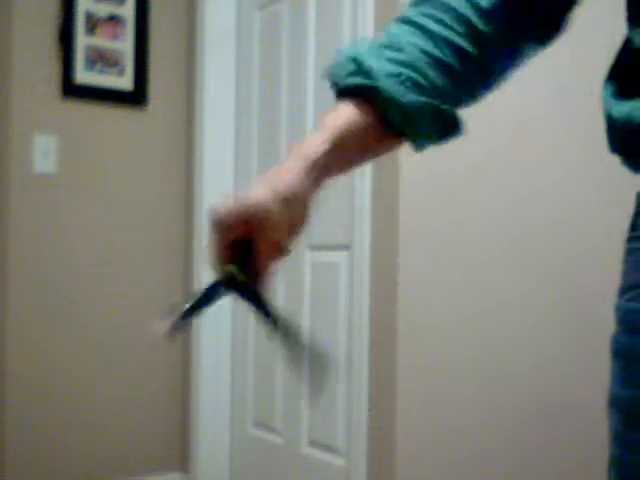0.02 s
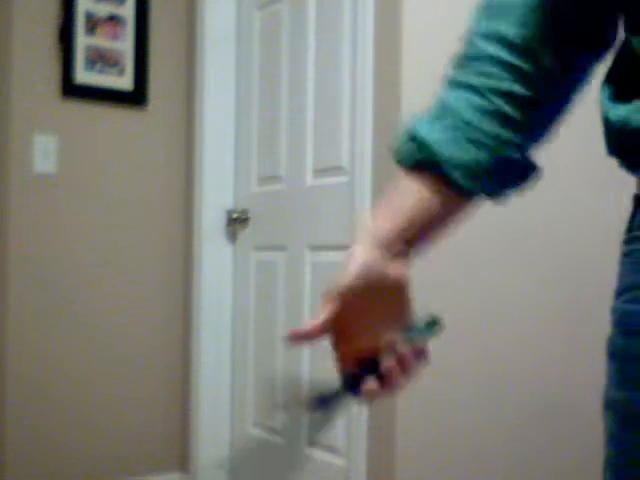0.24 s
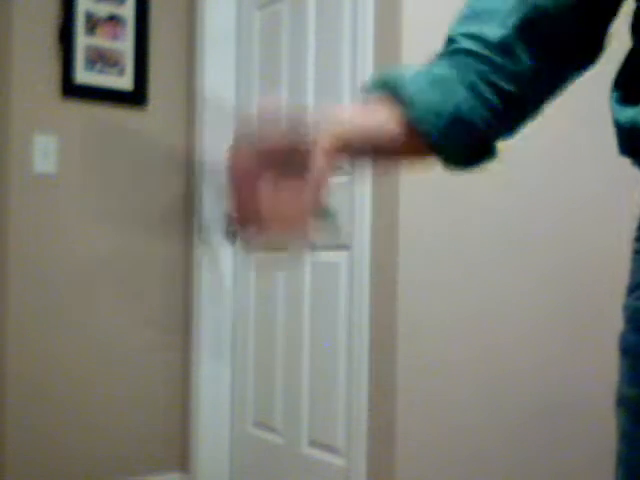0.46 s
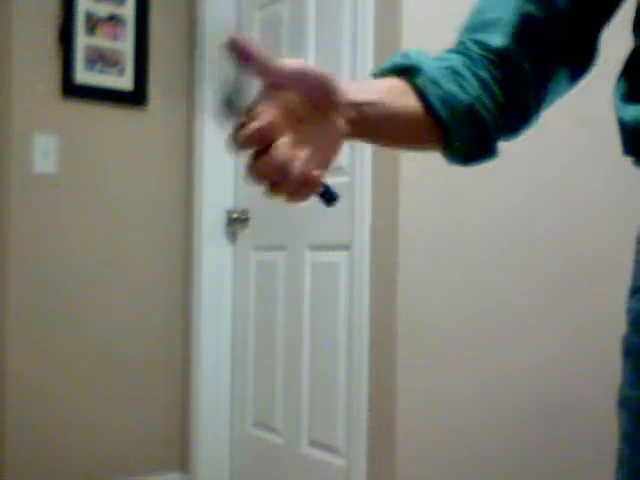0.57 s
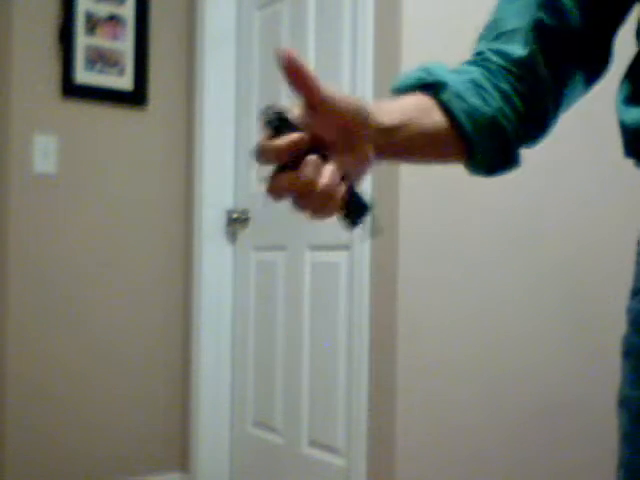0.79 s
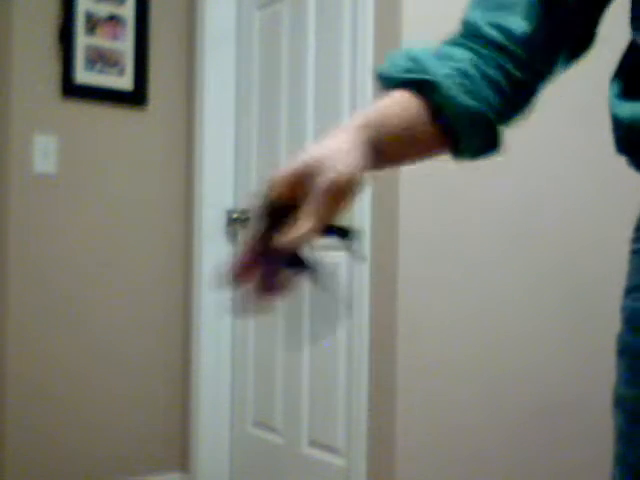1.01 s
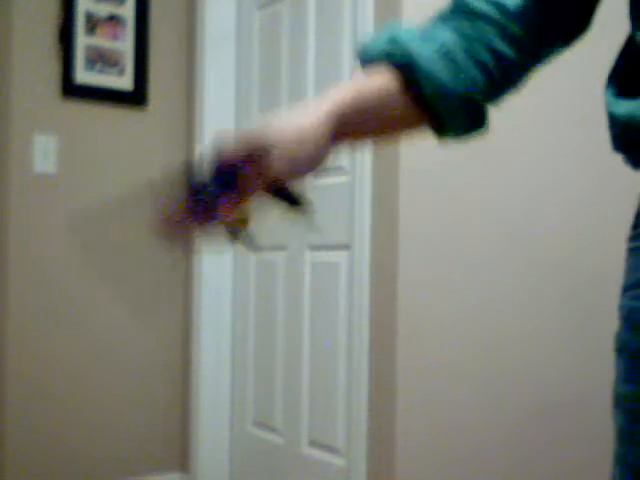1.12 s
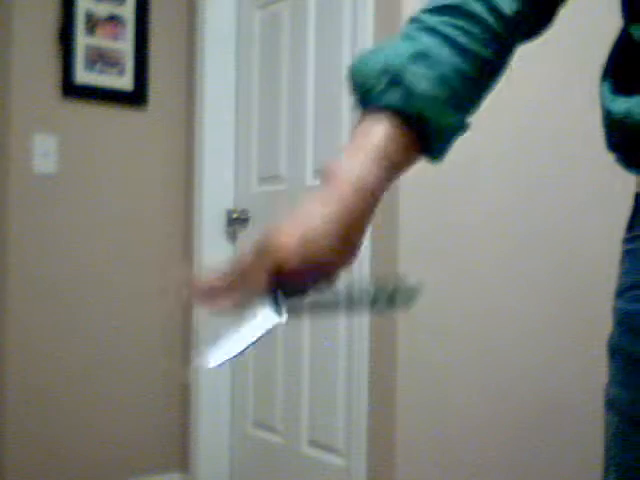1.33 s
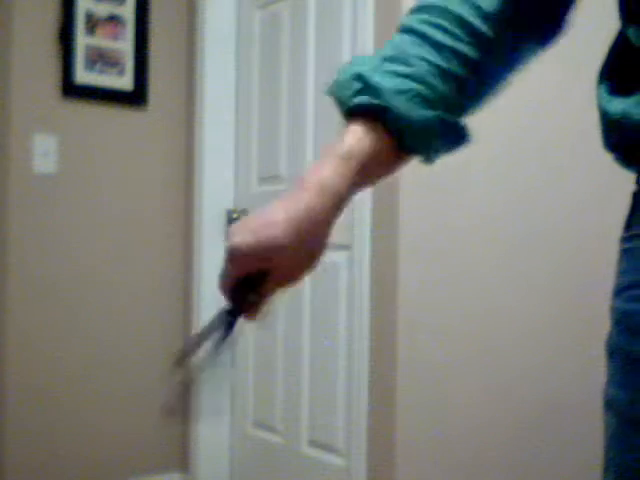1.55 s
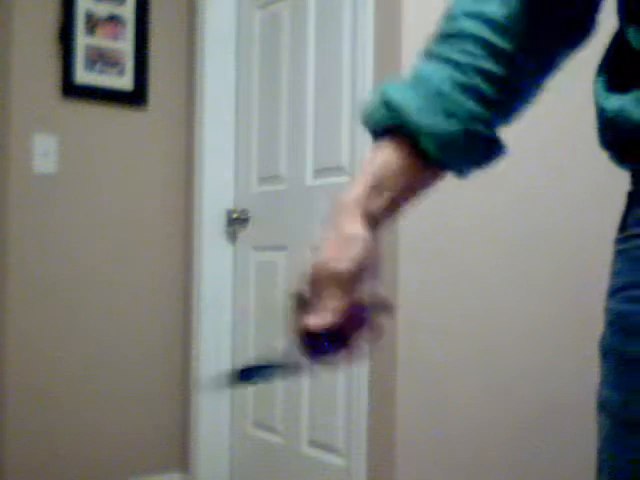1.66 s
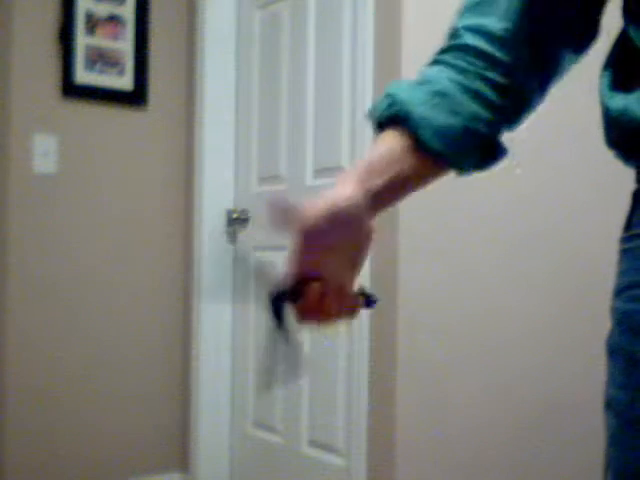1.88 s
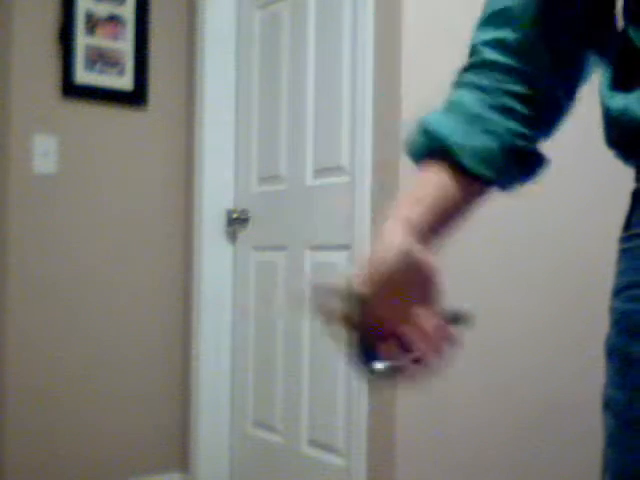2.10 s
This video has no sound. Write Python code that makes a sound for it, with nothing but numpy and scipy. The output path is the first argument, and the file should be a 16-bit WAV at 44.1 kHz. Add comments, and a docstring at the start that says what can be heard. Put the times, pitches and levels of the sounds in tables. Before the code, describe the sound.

A butterfly knife flipped by hand, clicking and clacking over a low room hum.

```python
"""Small quiet room: a butterfly knife is flipped by hand.
Its handles tick on their pivots and clack against the blade and each other.
Each contact is a short crack and a steel ring, some with a dull knock, answered by the walls.
Mains hum, a fan and air noise lie underneath.
The narrow-band microphone overloads on the hardest clacks."""
import sys
import numpy as np
from scipy import signal
from scipy.fft import rfft, irfft, next_fast_len
from scipy.io import wavfile
from scipy.ndimage import map_coordinates

SR = 44100
rng = np.random.default_rng(int(sys.argv[2]) if len(sys.argv) > 2 else 0)


def int16_out(signal):
    """Quantize to a 16-bit WAV file."""
    q = np.round(np.clip(np.atleast_2d(signal).T, -1, 1) * 32767)
    wavfile.write(sys.argv[1], SR, q.astype(np.int16))


N = 97020

# Handle and blade contacts: t/s, crack/dB, low ring/dB, middle ring/dB, high ring/dB,
# ring t60 factor (about 1 free, less gripped), room tail/dB
CLACKS = [ (.0635, -35, -35.5, -41, -36, .5, -10), (0.067, -36, -38.5, -41, -54.5, 0.3, -11),
          (.178, -27, -30.5, -37.5, -38.5, 1.2, -9), (.202, -37.5, -32.5, -39, -50.5, 0.75, -4),
          (.2108, -13.5, -22, -16.5, -32, 0.33, -7), (.215, -26.5, -24, -21.5, -34, 0.92, 1.5),
          (0.276, -37, -62.5, -41.5, -53, .8, -7), (0.287, -37.5, -36.5, -41, -54, .6, -9),
          (0.3988, -30.5, -34, -40, -42.5, .5, -3), (0.423, -24, -28, -48, -46, 0.47, -6),
          (0.4357, -3.5, -19, -6.5, -20.5, 0.31, 0), (0.4443, -13, -22, -3, -22.5, 0.58, -20),
          (0.4807, -2, -27, -17, -12, .8, 9.5), (0.4869, -12.5, -23, -13, -19, 0.52, -8),
          (.4905, 3.5, -9, -8, -3.5, 0.37, -15.5), (.502, -2.5, -15.5, -2.5, -17, 0.62, -6.5),
          (0.7374, -25, -24, -37, -22.5, 0.9, 0.5), (0.7516, -18.5, -18.5, -34, -22, 0.83, -4),
          (0.9227, -27.5, -35.5, -28, -27, .25, -13), (.939, -28, -37, -43, -36.5, 0.29, 0),
          (0.9575, -22, -35, -31.5, -29.5, 0.37, -3), (1.013, -38, -47, -23, -32, 0.61, -3),
          (1.017, -42, -35, -23, -35, .8, -4), (1.309, -31, -38, -35.5, -36.5, .8, -12.5),
          (1.326, -31.5, -40, -40, -50, .8, -5), (1.516, -43, -52, -46, -35, 1, -5),
          (1.522, -24, -38, -39, -35, 0.76, 0.5), (1.626, -22.5, -31.5, -26.5, -35, .7, 0),
          (1.6635, -28, -48, -48, -31, 0.39, -10), (1.672, -26, -34, -37, -38.5, 0.8, 1.5),
          (1.735, -16, -35, -25.5, -19.5, .4, -5.5), (1.7403, -22.5, -28, -28, -39, 0.35, 0),
          (1.784, -50, -39.5, -34.5, -27, 1.1, -5.5), (1.7945, -27.5, -31.5, -34.5, -31.5, 0.6, -3.5),
          (1.813, -41, -41, -28, -44, .9, -9.5), (1.9616, -35.5, -32.5, -37, -31, .5, -5),
          (1.9862, -10, -23.5, -15, -29, 0.88, -3.5), (1.996, -14, -23.5, -20.5, -16, 0.31, -9.5),
          (2.0675, -33, -33.5, -31, -38, 0.4, 1.5)]
# Steel modes, five each in a low, middle and high cluster: f/Hz, level/dB, t60/s
STEEL_MODES = [(4330, -4, .05), (4560, -1, .07), (4700, 0, .07), (4860, -1, .05), (5030, -3, .04),
               (6360, -5, .06), (6520, 0, .08), (6570, -2, .08), (6690, -1, .08), (6890, -7, .05),
               (7100, -5, .04), (7290, -3, .05), (7440, -3, .06), (7570, -1, .07), (7630, -1, .08)]
# Crack spectrum: f/Hz, gain/dB
CRACK_SPECTRUM = [(150, -42), (400, -33), (1500, -27.5), (2400, -29), (3200, -11), (4500, -3.5),
                  (5300, -0.5), (6000, 0), (7000, 1), (8000, -4)]
# Handle on handle or hand: t/s, level/dB, f/Hz, t60/s
DULL_KNOCKS = [(0.209, -32.5, 1930, 0.025), (0.288, -38.5, 2480, 0.048), (0.435, -24, 379, 0.014),
               (0.4372, -18.5, 3390, 0.22), (.4375, -32, 820, .015), (.489, -22.5, 620, 0.022),
               (0.491, -24, 1124, .02), (0.4923, -17.5, 2360, 0.0069), (.491, -10, 3500, 0.03),
               (0.7509, -33.5, 2150, 0.02), (.9235, -36, 2520, .01), (1.628, -38, 3640, 0.047),
               (1.734, -29, 1054, 0.012), (1.7346, -44.5, 2100, .008), (1.7345, -34, 520, 0.012)]
# Mains harmonics, fundamental first: rms level/dB
HUM_HARMONICS_DB = [-33, -36, -50.5, -48]
# Fan tones: f/Hz, rms level/dB
FAN_PARTIALS = [(258.3, -45), (369, -47), (739.8, -46.5), (829.2, -50), (1023, -51), (1969.3, -48.5),
                (2078, -59), (2772, -59.5)]
# Room noise and hiss spectrum: f/Hz, gain/dB
AIR_SPECTRUM = [(20, 4), (45, -2.5), (95, 0), (150, -5.5), (195, 2), (280, 0), (450, -1.5), (800, -2.5),
                (1300, -1.5), (1700, -9), (2300, -17), (3300, -16.5), (4800, -10.5), (6000, -12.5),
                (7000, -11.5), (8000, -23)]
# Microphone response: f/Hz, gain/dB
MIC_RESPONSE = [(10, -0.5), (7550, -3.5), (7850, -9.5), (8100, -13), (8350, -40.5), (10000, -52.5),
                (13000, -72.5)]

CRACK_T60_S = 0.0066
MODE_SPREAD_DB, GRIP_DETUNE_RATIO, PIVOT_BLUR_HZ = 3.5, 0.006, 45
KNOCK_EDGE_RATIO = 1.18
TICK_COUNT, TICK_DB, TICK_SPREAD_DB = 25, -47, 5.5
EARLY_DB, EARLY_T60_S, TAIL_T60_S, WALL_RISE_S = -0.5, 0.075, 0.23, 0.002
MAINS_HZ, AIR_DB = 59.95, -35
FAN_WAVER_RAD, FAN_WAVER_PER_S = 0.12, 3.6
CLIP_LEVEL, CUTOFF_HZ = 0.91, 15900


def knife():
    """Clacks, knocks and pivot ticks, each with its room response."""
    out = np.zeros(N + SR)
    t = np.arange(SR // 3) / SR
    add_clacks(out, t)
    add_knocks(out, t)
    add_pivot_ticks(out, t)
    return out[:N]


def add_clacks(out, t):
    """Each contact cracks and excites three clusters of steel modes."""
    clusters = np.array_split(np.array(STEEL_MODES), 3)
    for start_s, *levels_db, t60_factor, tail_db in CLACKS:
        walls = room(t, EARLY_DB, tail_db)
        rings = [steel_ring(t, modes, t60_factor) for modes in clusters]
        for part, db in zip([crack(t), *rings], levels_db):
            add_in_room(out, start_s, db, part, walls)


def crack(t):
    """Steel on steel: a short, bright noise burst."""
    return coloured(burst(t, CRACK_T60_S), CRACK_SPECTRUM)


def steel_ring(t, modes, t60_factor):
    """One mode cluster, damped and detuned by the grip, blurred by pivot play."""
    out = np.zeros(len(t))
    for hz, db, t60_s in modes:
        blur_rad = np.cumsum(rng.standard_normal(len(t))) * np.sqrt(2 * np.pi * PIVOT_BLUR_HZ / SR)
        detuned_hz = hz * (1 + GRIP_DETUNE_RATIO * rng.normal())
        phase_rad = 2 * np.pi * (detuned_hz * t + rng.random()) + blur_rad
        gain = amp(db + MODE_SPREAD_DB * rng.normal())
        out += gain * fade(t, t60_s * t60_factor) * np.sin(phase_rad)
    return out


def add_knocks(out, t):
    """A handle hits the other handle or the hand: band-passed bursts."""
    for start_s, db, hz, t60_s in DULL_KNOCKS:
        band_hz = [hz / KNOCK_EDGE_RATIO, hz * KNOCK_EDGE_RATIO]
        body = signal.butter(2, band_hz, 'bandpass', fs=SR, output='sos')
        knock = signal.sosfilt(body, burst(t, t60_s))
        add_in_room(out, start_s, db, knock, room(t, early_db=-14, tail_db=-14))


def add_pivot_ticks(out, t):
    """Loose pivots tick faintly at random times."""
    for start_s in rng.uniform(0, N / SR, size=TICK_COUNT):
        tick = crack(t)
        db = TICK_DB + TICK_SPREAD_DB * rng.normal()
        add_in_room(out, start_s, db, tick, room(t, EARLY_DB, tail_db=-14))


def room(t, early_db, tail_db):
    """Impulse response for one knife position: direct sound, near walls, short tail."""
    early = amp(early_db) * burst(t, EARLY_T60_S)
    tail = amp(tail_db) * burst(t, TAIL_T60_S)
    response = (early + tail) * (1 - np.exp(-t / WALL_RISE_S))
    response[0] = 1
    return response


def add_in_room(out, start_s, db, sound, walls):
    """Mix in a sound with its reflections; db sets the rms of the first 10 ms."""
    heard = signal.fftconvolve(sound, walls)[:len(sound)]
    onset_rms = np.std(heard[:SR // 100])
    out[round(start_s * SR):][:len(sound)] += amp(db) * heard / onset_rms


def mains_hum(t):
    """Steady mains harmonics, sawtooth-like."""
    return np.sqrt(2) * sum(amp(db) * np.sin(2 * np.pi * k * MAINS_HZ * t)
                            for k, db in enumerate(HUM_HARMONICS_DB, 1))


def fan(t):
    """Fan tones, wavering slightly in phase."""
    return np.sqrt(2) * sum(amp(db) * np.sin(2 * np.pi * hz * t + FAN_WAVER_RAD * wobble(FAN_WAVER_PER_S))
                            for hz, db in FAN_PARTIALS)


def air():
    """Steady room noise and hiss."""
    noise = coloured(rng.standard_normal(N), AIR_SPECTRUM)
    return amp(AIR_DB) * noise / np.sqrt(np.mean(noise ** 2))


def amp(db):
    """Decibels to gain."""
    return 10 ** (np.asarray(db) / 20)


def coloured(x, spectrum):
    """Filter by (f/Hz, gain/dB) points on a log frequency axis."""
    size = next_fast_len(len(x) + 4096)
    hz, db = np.transpose(spectrum)
    bins_hz = np.fft.rfftfreq(size, 1 / SR)
    gain = amp(np.interp(np.log(bins_hz + 1), np.log(hz), db))
    return irfft(rfft(x, size) * gain, size)[:len(x)]


def fade(t, t60_s):
    """Exponential decay."""
    return np.exp(-np.log(1000) * t / t60_s)


def burst(t, t60_s):
    """Decaying noise, unit energy."""
    noise = rng.standard_normal(len(t)) * fade(t, t60_s)
    return noise / np.linalg.norm(noise)


def wobble(knots_per_s):
    """Smooth random curve."""
    knots = rng.standard_normal(int(N * knots_per_s / SR) + 4)
    return map_coordinates(knots, [np.arange(N) * knots_per_s / SR])


def scene():
    """Knife over hum, fan and air; mono."""
    t = np.arange(N) / SR
    return (knife() + mains_hum(t) + fan(t) + air())[None]


def record(dry):
    """Narrow microphone band, overload, low-pass."""
    clipped = np.clip(coloured(dry[0], MIC_RESPONSE), -CLIP_LEVEL, CLIP_LEVEL)
    lowpass = signal.firwin(101, CUTOFF_HZ, fs=SR)
    return np.convolve(clipped, lowpass, 'same')[None]


dry = scene()
out = record(dry)
int16_out(out)
```